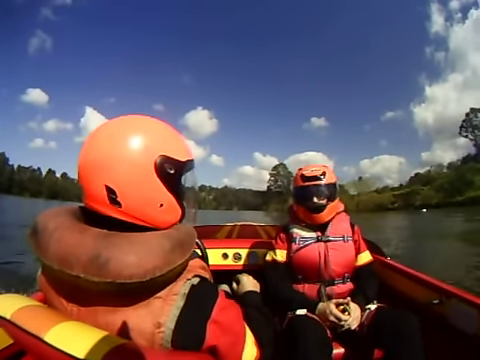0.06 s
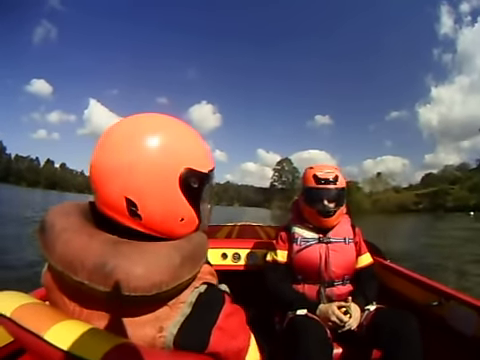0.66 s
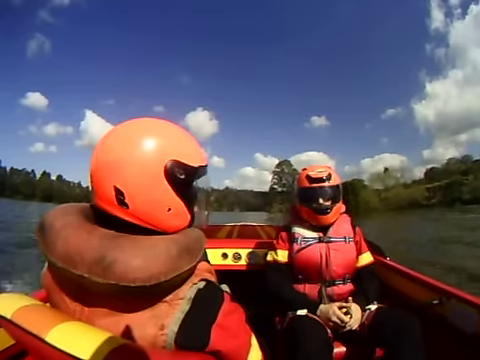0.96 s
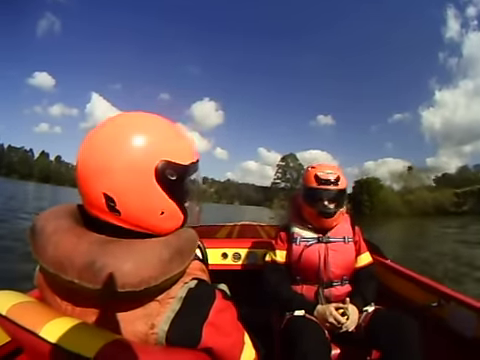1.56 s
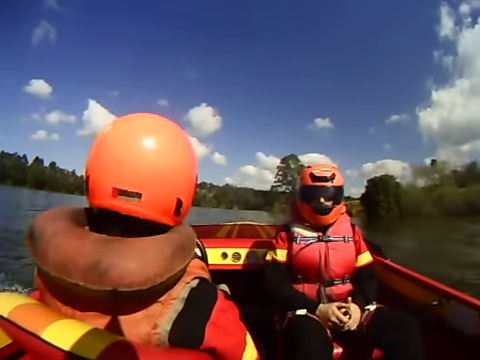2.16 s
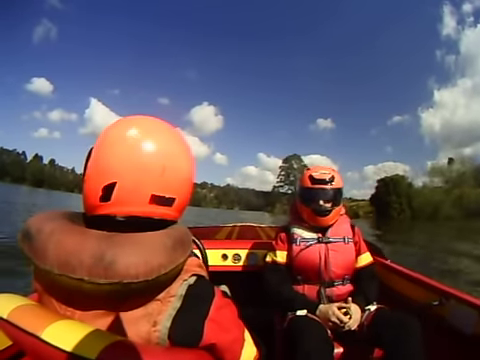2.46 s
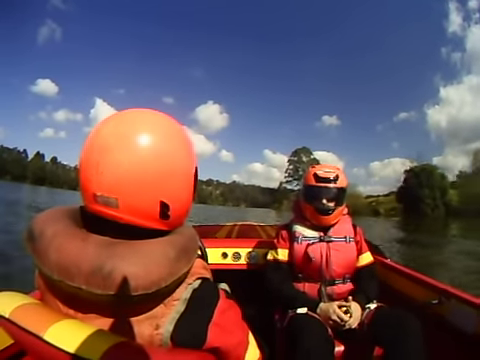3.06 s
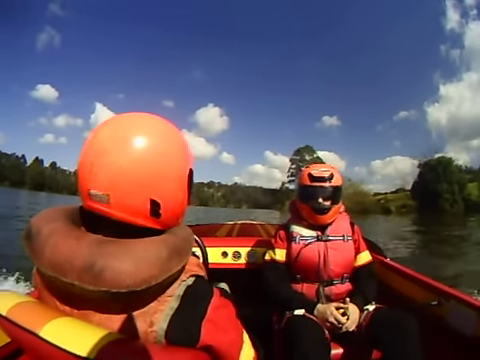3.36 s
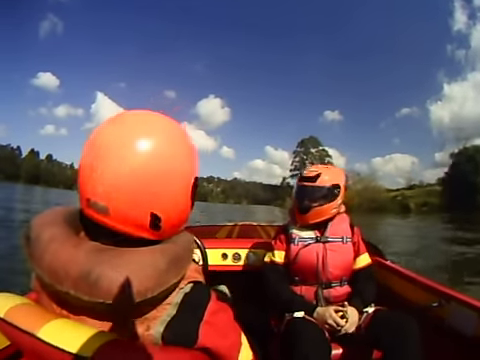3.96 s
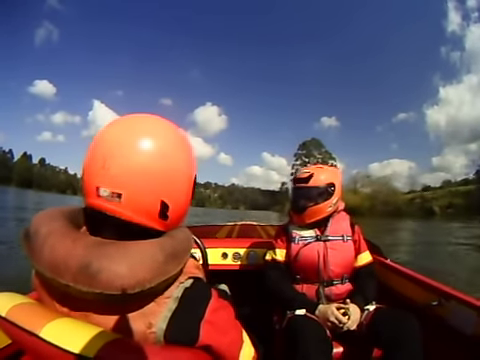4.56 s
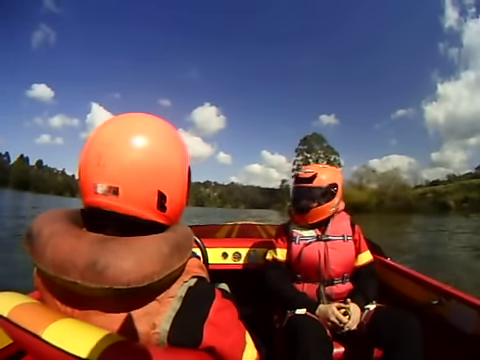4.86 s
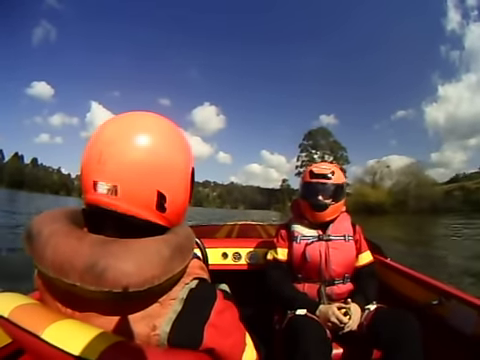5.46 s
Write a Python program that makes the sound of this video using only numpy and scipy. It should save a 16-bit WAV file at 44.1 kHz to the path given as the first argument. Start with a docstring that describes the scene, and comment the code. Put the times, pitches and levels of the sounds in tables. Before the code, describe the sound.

A loud, unsilenced speedboat engine runs steadily close by with a rough, barking throb, scattered sharp pops and wind on the microphone.

```python
"""A race boat's big unsilenced engine lopes at part throttle, heard from the open cockpit on a river. One
exhaust bank thumps close by; a few times a second it catches and barks for a firing or a short run, ringing the
pipes and booming the hull. The far bank and the valve clatter fill the gaps, and afterfire snaps now and then.
Wind buffets a small camera microphone that overloads on loud beats; the sound stops short above about 4 kHz."""
import sys
import numpy as np
from scipy import signal
from scipy.fft import rfft, irfft
from scipy.io import wavfile
from scipy.ndimage import uniform_filter1d

SR = 44100
rng = np.random.default_rng(int(sys.argv[2]) if len(sys.argv) > 2 else 0)


def master_out(mix):
    """Clip the mix to full scale and print it as 16-bit PCM to the path in sys.argv[1]."""
    frames = np.transpose(np.atleast_2d(mix))
    ceiling = np.clip(frames, -1, 1)
    pcm = np.round(ceiling * 32767).astype(np.int16)
    wavfile.write(sys.argv[1], SR, pcm)


N = 242991


def undb(db):
    """Decibels to gain."""
    return 10 ** (np.asarray(db) / 20)


def unit(x):
    """Scale to rms 1."""
    return x / np.sqrt(np.mean(x ** 2))


def response(spectrum, peaks=(), size=4096):
    """Causal impulse response of a spectrum, with resonant peaks on top."""
    hz, db = np.transpose(spectrum)
    f = np.maximum(np.fft.rfftfreq(size, 1 / SR), 1)
    gain_db = np.interp(np.log(f), np.log(hz), db)
    for centre, width, height in peaks:
        gain_db = gain_db + height / (1 + (2 * (f - centre) / width) ** 2)
    cepstrum = irfft(np.log(undb(gain_db)))
    cepstrum[1:size // 2] *= 2  # fold to minimum phase
    cepstrum[size // 2 + 1:] = 0
    return irfft(np.exp(rfft(cepstrum)))


def through(x, impulse):
    """Pass a signal through an impulse response."""
    return signal.fftconvolve(x, impulse)[:N]


def pulses(times, sizes):
    """Single-sample pulses at the given times."""
    at = np.round(times * SR).astype(int)
    inside = (at >= 0) & (at < N)
    return np.bincount(at[inside], sizes[inside], N)


def fade(decay_s, size=2048):
    """Exponential decay from 1."""
    return np.exp(-np.arange(size) / SR / decay_s)


# Spectrum of the wind right on the microphone: frequency_hz, relative_db
WIND_SPECTRUM = [(12, -5.5), (25, -4), (60, 6.5), (150, 5.5), (400, -9), (1500, -36.5)]


def wind():
    """Air flowing over the cockpit buffets the microphone with a low rumble."""
    return undb(-25) * unit(through(rng.standard_normal(N), response(WIND_SPECTRUM)))


def clatter(t, ticks_per_s=500, swell_db=3.5):
    """Valve gear ticks over a rush of exhaust gas, both a little louder as the engine pulls."""
    ticks = (rng.random(N) < ticks_per_s / SR) * rng.standard_normal(N)
    rush = rng.standard_normal(N)
    return undb(swell_db * engine_pull(t)) * (undb(-32.5) * unit(ticks) + undb(-33.5) * rush)


# Unburnt fuel going off in the pipes, near the cockpit: start_s, relative_db
AFTERFIRE_SNAPS = [(0.0462, 1), (0.2437, 4.5), (0.8450, -2), (1.0080, 2.5), (1.0204, -1), (1.0309, -1),
                   (1.4514, 2), (2.3584, 2.5), (3.0152, 5.5), (3.8377, -1.5), (3.9422, 4.5), (4.6526, 5.5),
                   (4.6934, -2), (4.7764, 7.5), (4.8017, 5.5), (4.8555, 8.5), (5.2420, 2.5), (5.4842, 3)]


def afterfire(snap_hz=3800):
    """Each snap is a bright shock, over within a millisecond, with a brief shove of gas behind it."""
    times, level_db = np.transpose(AFTERFIRE_SNAPS)
    t = np.arange(256) / SR
    shock = np.sin(2 * np.pi * snap_hz * t) * fade(decay_s=0.00013, size=256)
    shove = undb(-19) * fade(decay_s=0.00046, size=256)
    return -through(pulses(times, undb(level_db + 11.5)), shock + shove)


def hull_boom(times, thump_db, t, follow=0.34, wander_db=2.5, db_per_hz=-0.7):
    """The hull around the microphone booms at the firing rate, louder with strong thumps."""
    cycles = np.interp(t, times, np.arange(len(times)))
    rate_hz = firing_rate(times)
    resonance_db = db_per_hz * (rate_hz - rate_hz.mean())  # the engine slows towards the hull's resonance
    boom_db = -21.5 + follow * thump_db + resonance_db
    boom_db += wander_db * rng.standard_normal(len(times))
    swing = np.interp(t, times, uniform_filter1d(undb(boom_db), size=4))  # smoothed over four firings
    return -swing * np.cos(2 * np.pi * (cycles + 0.03))


# Broad colour of the gas at the pipe mouths: frequency_hz, relative_db
GAS_SPECTRUM = [(100, -14.5), (300, 2.5), (750, 6), (1100, 1), (1700, 1.5), (2200, 3.5), (2850, -6.5),
                (3600, -12), (4200, -17.5), (4800, -23)]
# Pipe resonances standing above that colour: pitch_hz, width_hz, boost_db
PIPE_MODES = [(1392, 138, 10.5), (2380, 110, 2.5), (2515, 270, 11), (2997, 130, 5), (3556, 47, 6)]


def exhaust_pipes(excitation):
    """The pipes colour the sound passing through them and ring at their modes."""
    lowpass = signal.butter(4, 5000, fs=SR, output="sos")
    ring = signal.sosfilt(lowpass, response(GAS_SPECTRUM, PIPE_MODES))
    return through(excitation, ring / np.sqrt(np.sum(ring ** 2)))


def far_bank(times, crack_db, in_run, lag_s=0.0075, join_db=4, scatter_db=2):
    """The bank farther from the microphone answers with weaker, uneven shocks, harder inside a run."""
    jitter, strength = rng.standard_normal((len(times), 2)).T
    level_db = 1.11 * crack_db - 9 + join_db * in_run + scatter_db * np.minimum(strength, 1)
    return pulses(times + lag_s + 0.0018 * jitter, undb(level_db))


def exhaust_cracks(times, crack_db, in_run):
    """Each firing of either bank sends out a shock front and a short puff of turbulent gas."""
    shocks = pulses(times, undb(crack_db)) + far_bank(times, crack_db, in_run)
    # the jet takes a moment to break into turbulence behind the front
    puff = fade(decay_s=0.0024) - fade(decay_s=0.00037)
    turbulence = through(shocks, puff) * rng.standard_normal(N)
    # the harder the shock, the steeper its front and the brighter its rasp
    steep = through(shocks ** 2, puff) * rng.standard_normal(N)
    rasp = signal.sosfilt(signal.butter(2, 3500, "highpass", fs=SR, output="sos"), steep)
    return undb(3) * turbulence - undb(19.5) * shocks + undb(20.5) * rasp


# Spectrum of one firing's pressure pulse at close range: frequency_hz, relative_db
THUMP_SPECTRUM = [(20, -6.5), (50, -5), (85, 3.5), (150, 0), (240, -1.5), (320, -7), (450, -7), (700, -8),
                  (1100, -21.5), (2000, -28.5), (4500, -51.5)]


def exhaust_thumps(times, thump_db):
    """Each firing of the near bank arrives as a steep pressure pulse with a slower rebound."""
    pulse = signal.sosfilt(signal.butter(2, 2500, fs=SR, output="sos"), response(THUMP_SPECTRUM))
    return -through(pulses(times, undb(thump_db - 2)), pulse / np.abs(pulse).max())


# Engine speed along the river, counted on the near bank: time_s, firing_rate_hz
ENGINE_SPEED = [(0, 80), (1, 79.8), (1.7, 78.6), (2.3, 77.2), (2.9, 75.6), (3.6, 75.6), (4.5, 75.2),
                (5.5, 74.6)]


def firing_rate(t):
    """Firings per second of the near bank, easing down as the engine slows."""
    time_s, rate_hz = np.transpose(ENGINE_SPEED)
    return np.interp(t, time_s, rate_hz)


def firing_times(bark_s, tail_firings=20):
    """Firings fall evenly between the barks near the running speed; also gives each bark's index."""
    rate_hz = firing_rate(bark_s)
    lead_firings = int(bark_s[0] * rate_hz[0]) + 2
    gap_firings = np.maximum(np.round(np.diff(bark_s) * rate_hz[1:]), 1)
    bark_index = lead_firings + np.r_[0, np.cumsum(gap_firings)].astype(int)
    last = bark_index[-1] + tail_firings
    anchor_s = np.r_[bark_s[0] - lead_firings / rate_hz[0], bark_s, bark_s[-1] + tail_firings / rate_hz[-1]]
    return np.interp(np.arange(last + 1), np.r_[0, bark_index, last], anchor_s), bark_index


# The four cylinders nearest the microphone, in firing order: relative_db
CYLINDER_BALANCE = [6.5, 3.8, -5, 1.2]
# Hard firings close by, singly or in runs: start_s, length_s, relative_thump_db, relative_crack_db
ENGINE_BARKS = [(0.0443, 0.017, 0, -12), (0.1205, 0.045, -1.5, -15), (0.183, 0.011, 5, -13.5),
                (0.1944, 0.015, -7.5, -9), (0.22, .039, 0, -13), (0.3328, .026, -3, -13),
                (0.3688, 0.011, -7, -15), (0.4805, 0.01, -7.5, -20.5), (0.5714, .013, -6, -12),
                (0.5983, .026, -4, -10), (0.6937, .013, -4, -15.5), (0.7469, .013, -6, -17),
                (0.783, .013, -0.5, -13), (0.834, 0.023, 0, -9), (0.9083, .013, -3.5, -16.5),
                (0.935, 0.022, -2, -13.5), (0.9955, .039, -3, -14), (1.0574, 0.035, -1, -14.5),
                (1.2584, 0.023, -7.5, -16.5), (1.319, 0.0083, -14, -19), (1.4409, 0.034, -0.5, -11.5),
                (1.4909, .026, -2, -13), (1.6343, .026, -2.5, -12), (1.6839, 0.043, -3, -15.5),
                (1.8408, 0.01, -12.5, -18), (1.9296, 0.016, 1, -17.5), (2.085, .013, -6, -18.5),
                (2.267, .026, -3, -16.5), (2.318, .026, -2.5, -14), (2.357, .026, -1, -15),
                (2.4232, .013, -5.5, -13.5), (2.553, 0.02, 0, -11.5), (2.7514, .026, 1, -12.5),
                (2.805, 0.023, -2, -15.5), (2.8559, 0.014, 1.5, -10), (2.963, 0.016, -1, -12.5),
                (3.0151, .026, -3, -15), (3.0704, .013, 0, -14.5), (3.11, .013, 0, -14),
                (3.203, 0.02, -2, -11), (3.2672, 0.015, -1, -14), (3.2946, .013, -16.5, -10.5),
                (3.334, 0.023, -3, -12.5), (3.3881, .026, -7, -13.5), (3.4813, 0.019, -7, -18),
                (3.601, 0.012, 0, -12.5), (3.6401, 0.018, 1, -10.5), (3.7072, 0.0096, -2, -16.5),
                (3.826, 0.047, 2, -11), (3.8763, .026, 0, -11), (3.9165, 0.043, 2, -15),
                (3.9674, .013, 2, -11.5), (4.0386, 0.032, 0, -14.5), (4.0892, .013, -5.5, -19),
                (4.1454, 0.011, -7, -22), (4.2382, 0.011, -9.5, -18.5), (4.3334, .013, -6, -15),
                (4.36, 0.032, -6, -18), (4.3973, .013, -5.5, -15.5), (4.4666, .039, -5, -18),
                (4.533, .013, 0, -13), (4.587, 0.014, -2, -15), (4.6394, 0.022, 4, -10),
                (4.6936, 0.011, -1.5, -14), (4.745, .013, -1.5, -11.5), (4.777, .039, -0.5, -9.5),
                (4.827, 0.023, 5, -10), (4.8698, .013, 5, -9.5), (5.002, 0.011, -5.5, -14),
                (5.0278, .013, 6, -9.5), (5.0529, .026, -5, -10.5), (5.094, .013, 1.5, -8.5),
                (5.1891, .013, 1.5, -11.5), (5.229, .026, 4, -9), (5.2817, 0.015, 7, -8.5),
                (5.3766, 0.012, -3, -12.5), (5.4184, 0.011, 1, -11.5), (5.4422, 0.012, 6.5, -12.5),
                (5.4573, .052, -0.5, -10.5)]


def near_bank(scatter_db=7, misfire_db=-2.5, thump_swell_db=7.5, crack_swell_db=5):
    """The near bank burns unevenly; gives each firing's time, two levels and whether a run carries on."""
    times, bark_index = firing_times(np.array(ENGINE_BARKS)[:, 0])
    burn, edge, jitter = rng.standard_normal((len(times), 3)).T
    uneven_db = np.resize(CYLINDER_BALANCE, len(times)) + scatter_db * np.minimum(burn, 1)
    pull = engine_pull(times)
    thump_db = -20.5 + thump_swell_db * pull + uneven_db
    crack_db = -28.5 + crack_swell_db * pull + 0.27 * uneven_db + 5.2 * np.minimum(edge, 1)
    # the firing before a bark burns poorly
    thump_db[bark_index - 1] += misfire_db
    crack_db[bark_index - 1] += misfire_db
    in_run = np.zeros(len(times))
    for first, (start_s, length_s, bark_thump_db, bark_crack_db) in zip(bark_index, ENGINE_BARKS):
        run = first + np.arange(max(round(length_s * firing_rate(start_s)), 1))
        thump_db[run] = bark_thump_db
        crack_db[run] = bark_crack_db
        in_run[run[:-1]] = 1
    jitter[bark_index] = 0
    return times + 0.00025 * jitter, thump_db, crack_db, in_run


def engine_pull(t, swell_s=0.039, full_pull_s=0.028):
    """How hard the engine pulls: 0 in a lull, towards 1 as nearby barking adds up past full_pull_s."""
    start_s, length_s, _, _ = np.transpose(ENGINE_BARKS)
    middle_s = start_s + (length_s - 1 / firing_rate(start_s)) / 2
    grid_s = np.arange(0, N, 100) / SR
    barking_s = length_s * np.exp(-0.5 * ((grid_s[:, None] - middle_s) / swell_s) ** 2)
    return np.interp(t, grid_s, np.tanh(barking_s.sum(axis=1) / full_pull_s))


def scene():
    """Engine, hull and wind as they reach one microphone in the cockpit."""
    t = np.arange(N) / SR
    times, thump_db, crack_db, in_run = near_bank()
    ringing = exhaust_pipes(exhaust_cracks(times, crack_db, in_run) + clatter(t))
    low_end = exhaust_thumps(times, thump_db) + hull_boom(times, thump_db, t)
    return (low_end + ringing + afterfire() + wind())[None]


def record(dry):
    """The camera microphone squashes the peaks; the treble ends sharply near 4 kHz, and overshoots clip with a
    tiny tick."""
    headroom, leak, ceiling = 0.62, 0.06, 0.72
    band_hz, top_hz = 3927, 15800
    pressure = signal.sosfilt(signal.butter(1, 6, "highpass", fs=SR, output="sos"), dry)
    rounded = pressure / (1 + (pressure / headroom) ** 6) ** (1 / 6)
    squashed = rounded + leak * (pressure - rounded)
    lowpass = signal.firwin(121, band_hz, window=("kaiser", 8), fs=SR)
    narrow = signal.fftconvolve(squashed, lowpass[None], "same")
    clipped = np.clip(narrow, -ceiling, ceiling)
    return signal.sosfilt(signal.ellip(8, 0.2, 70, top_hz, fs=SR, output="sos"), clipped)


dry = scene()
out = record(dry)
master_out(out)
```